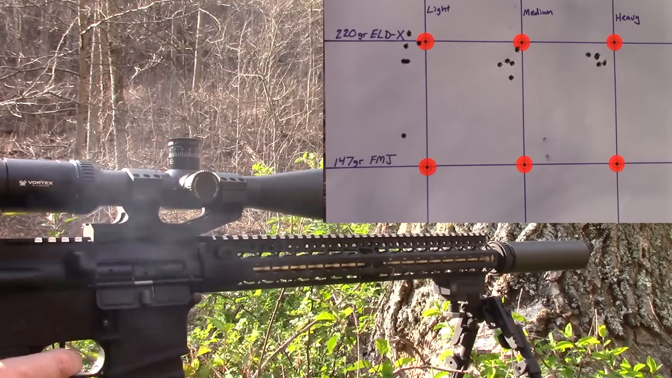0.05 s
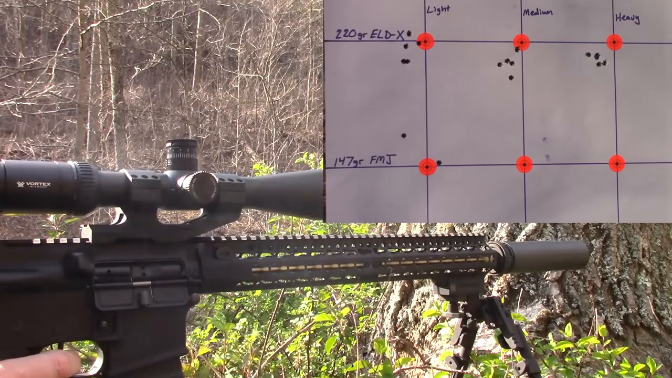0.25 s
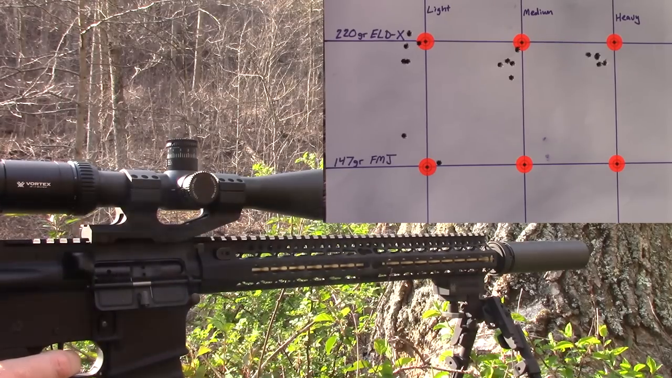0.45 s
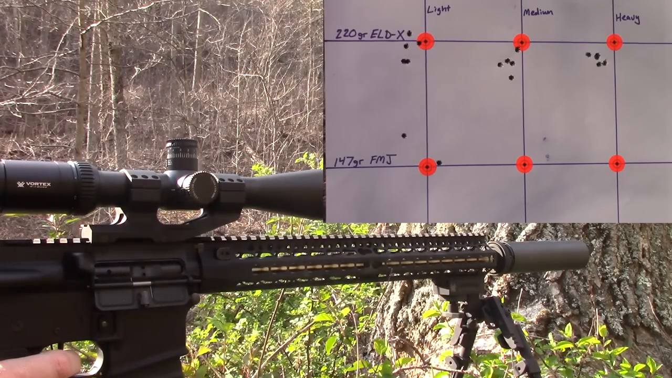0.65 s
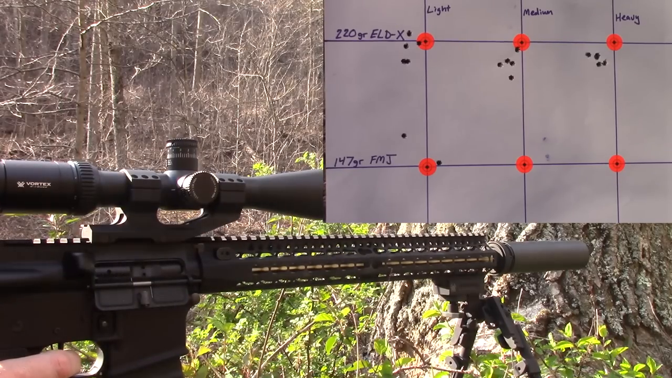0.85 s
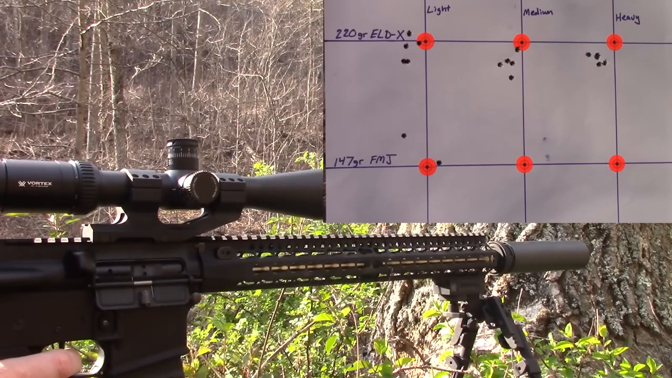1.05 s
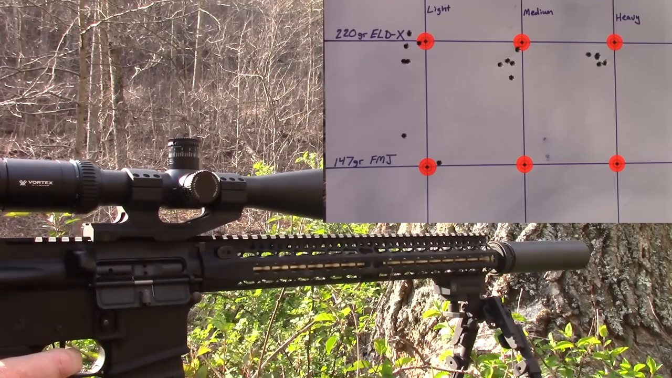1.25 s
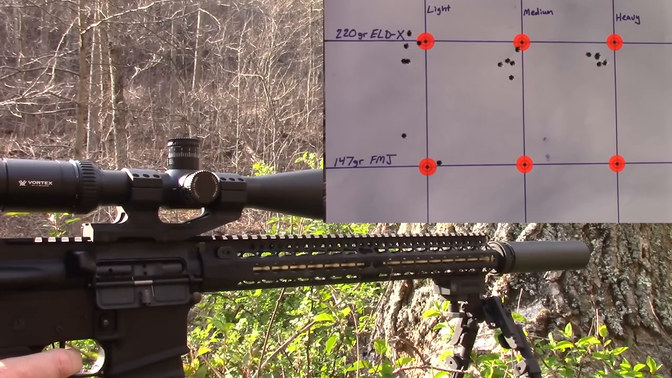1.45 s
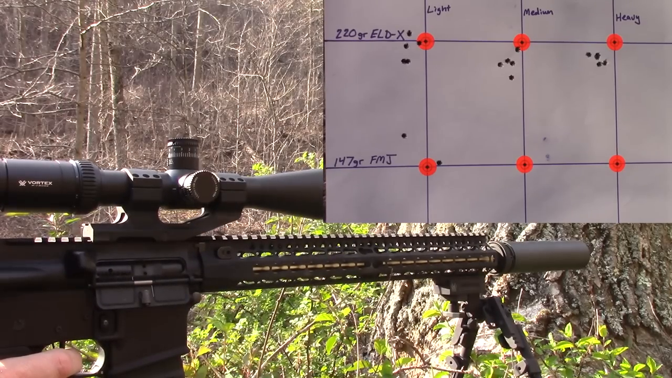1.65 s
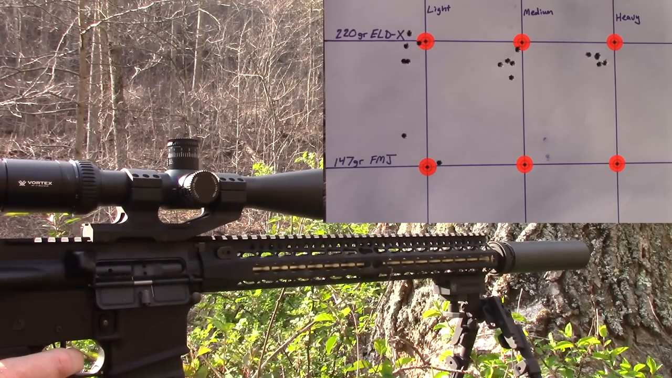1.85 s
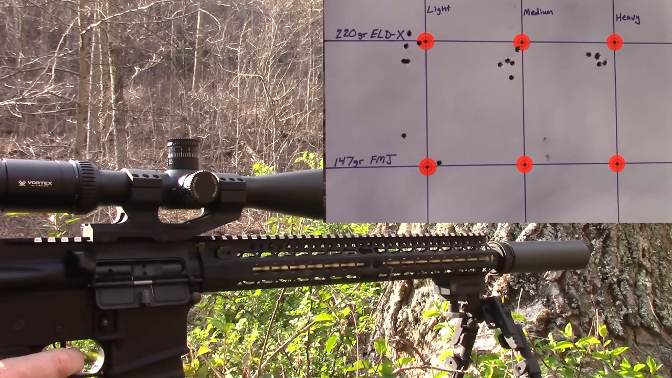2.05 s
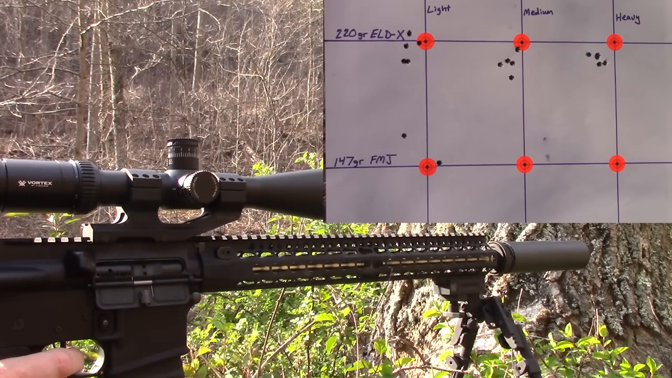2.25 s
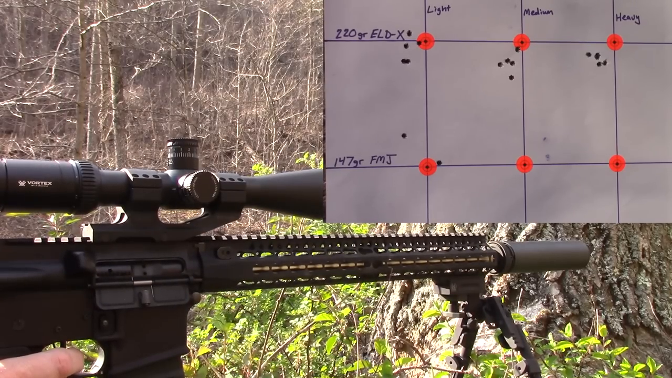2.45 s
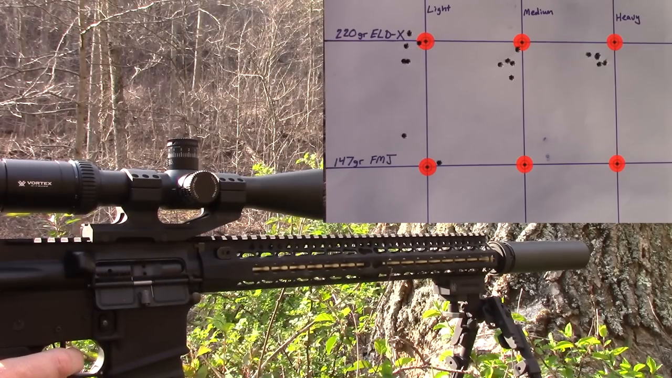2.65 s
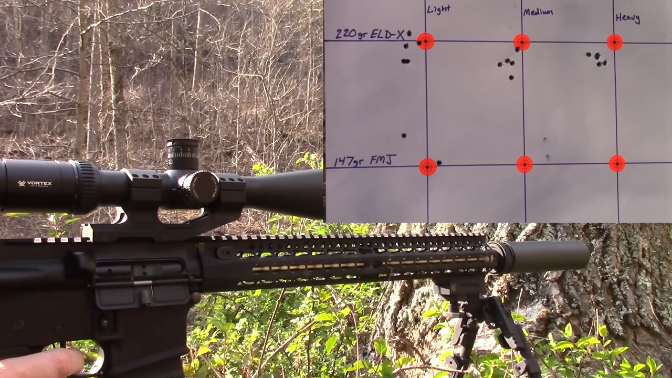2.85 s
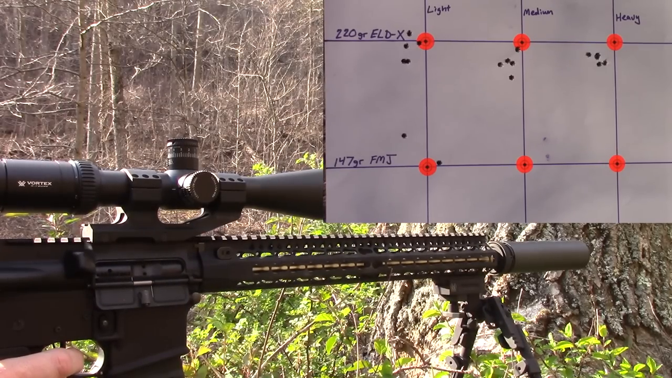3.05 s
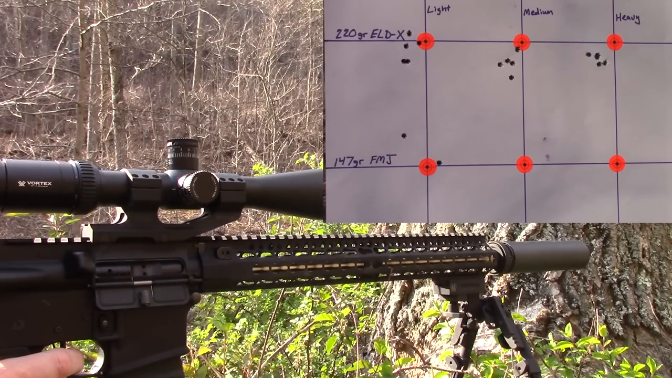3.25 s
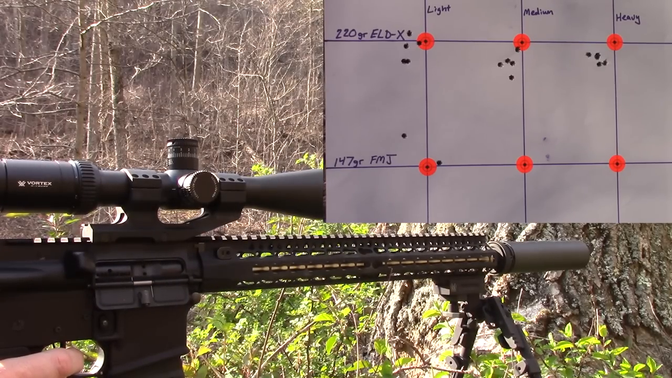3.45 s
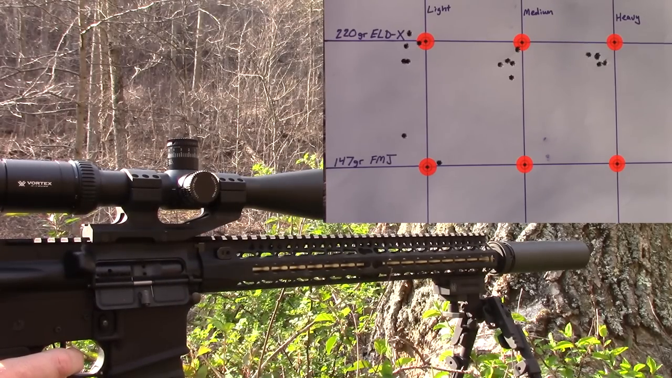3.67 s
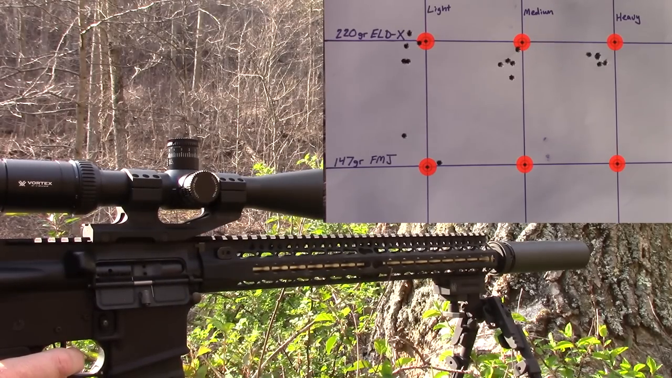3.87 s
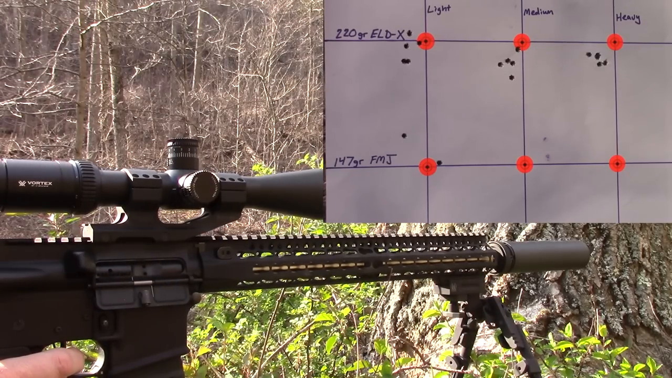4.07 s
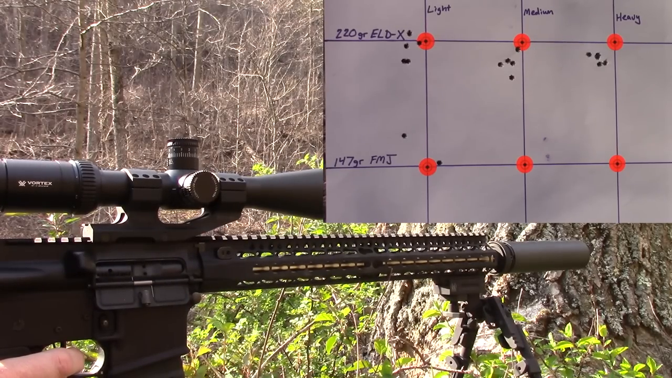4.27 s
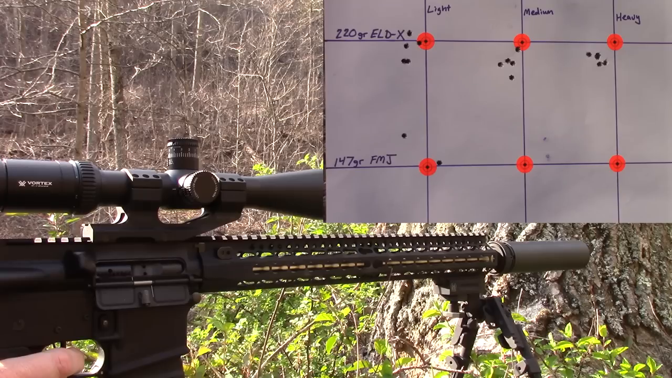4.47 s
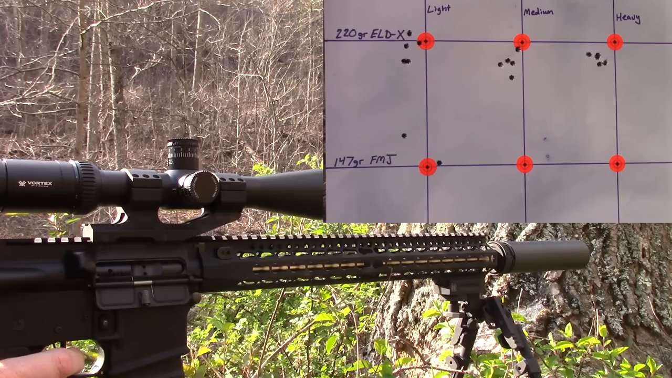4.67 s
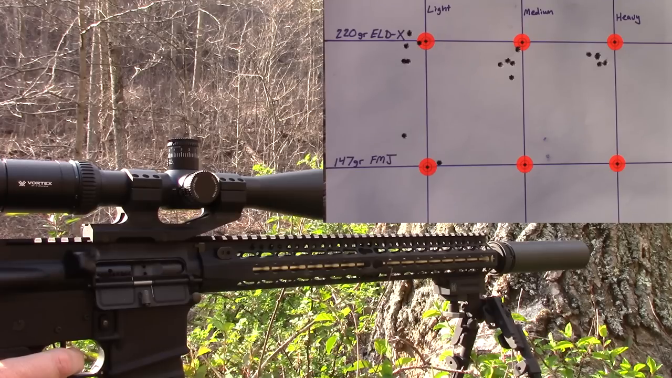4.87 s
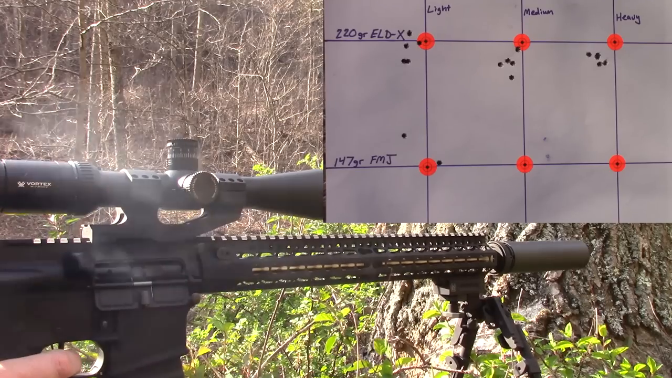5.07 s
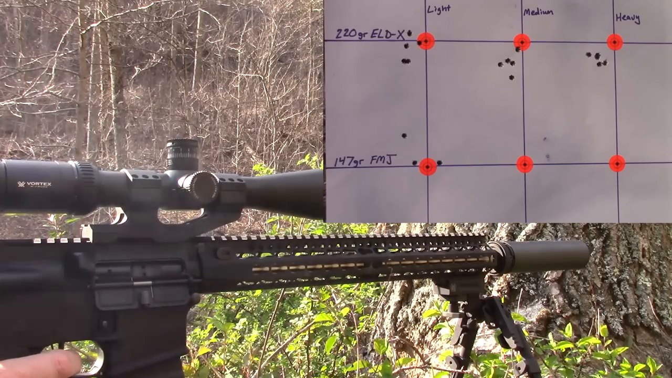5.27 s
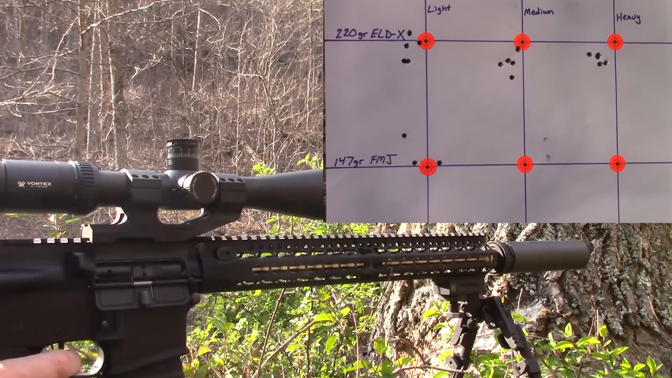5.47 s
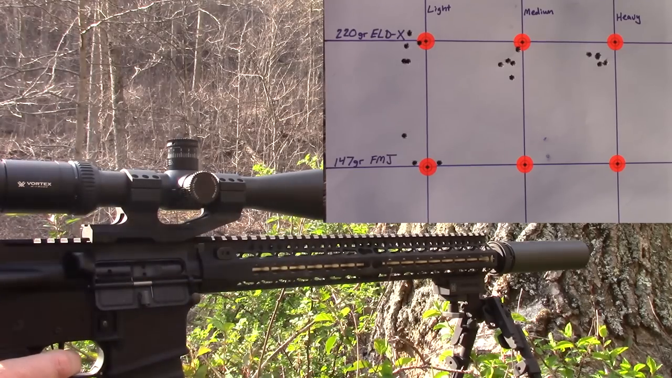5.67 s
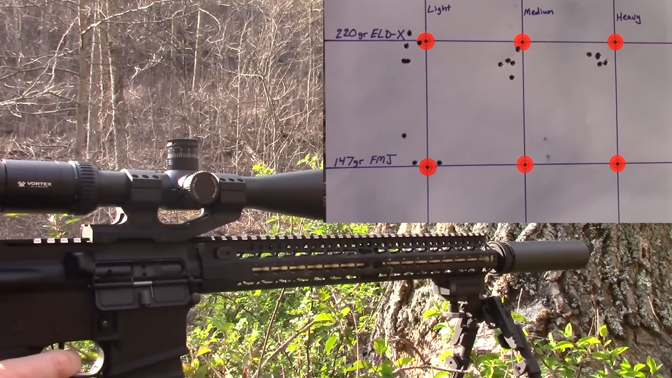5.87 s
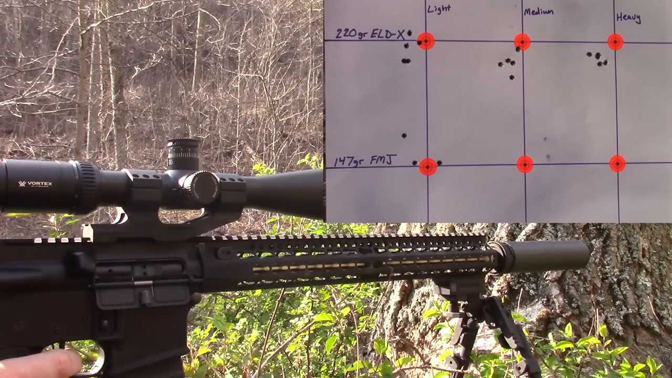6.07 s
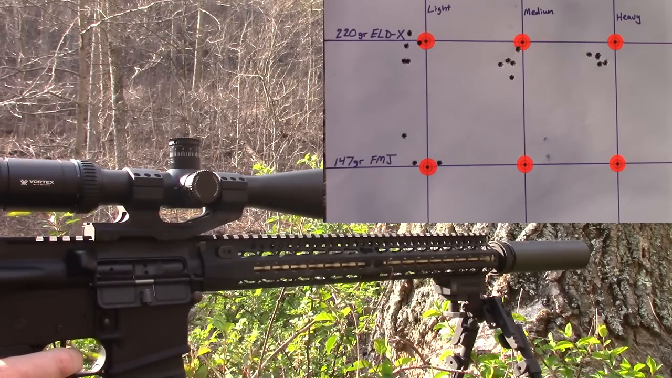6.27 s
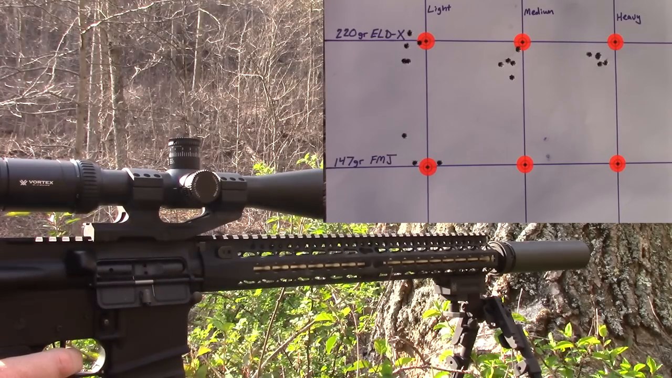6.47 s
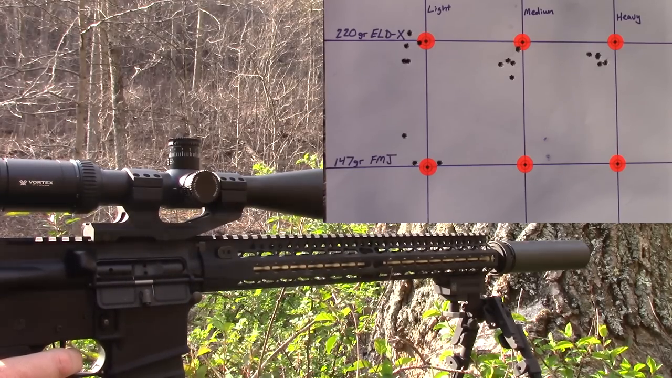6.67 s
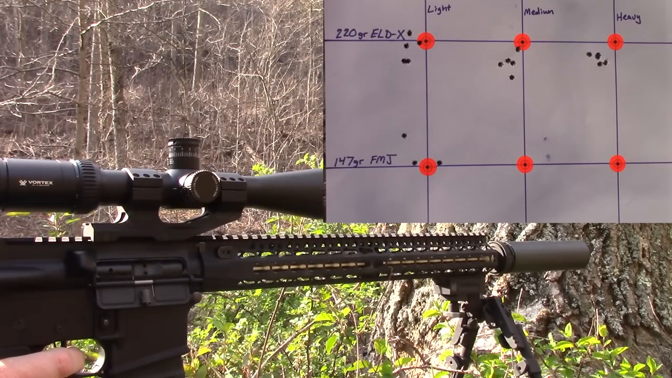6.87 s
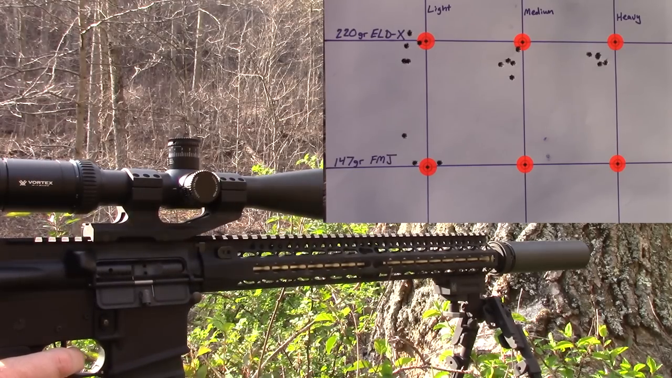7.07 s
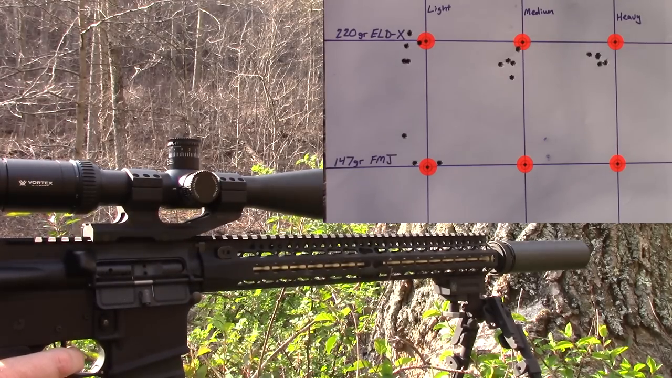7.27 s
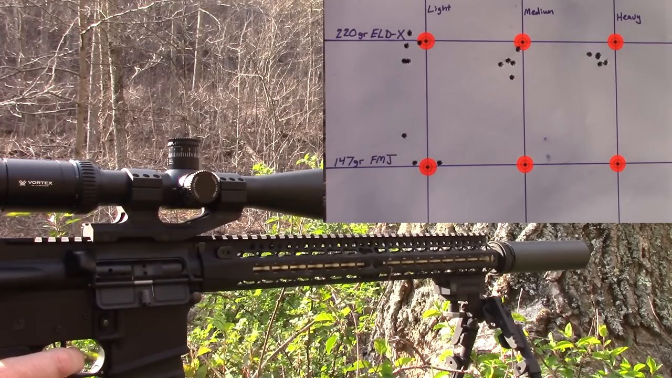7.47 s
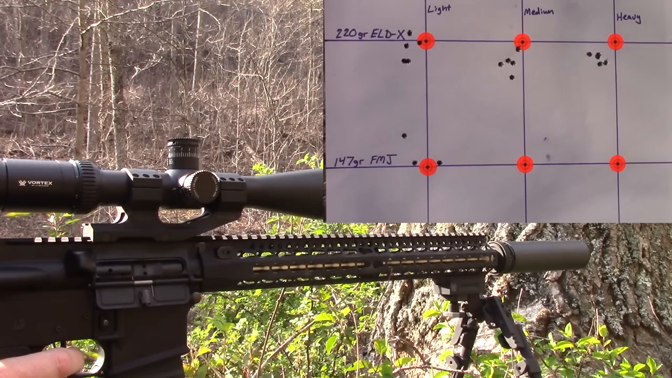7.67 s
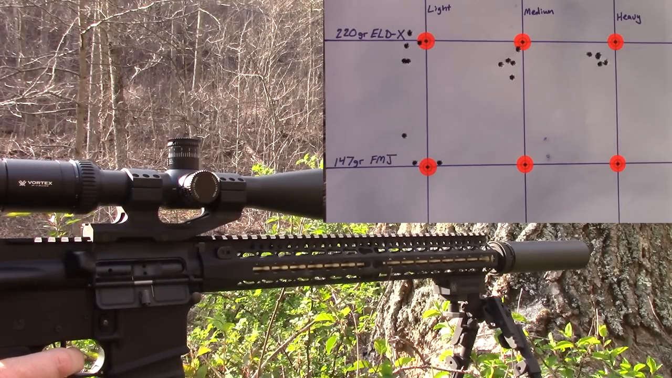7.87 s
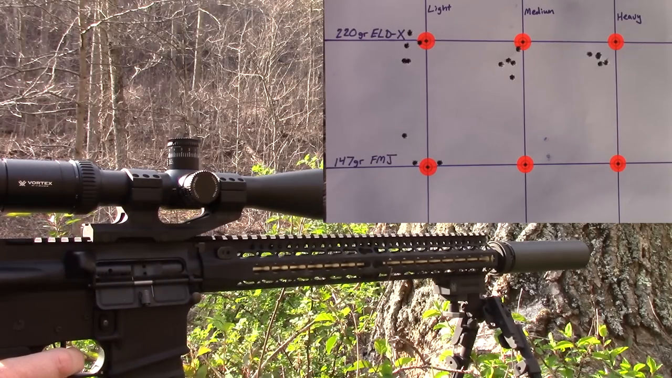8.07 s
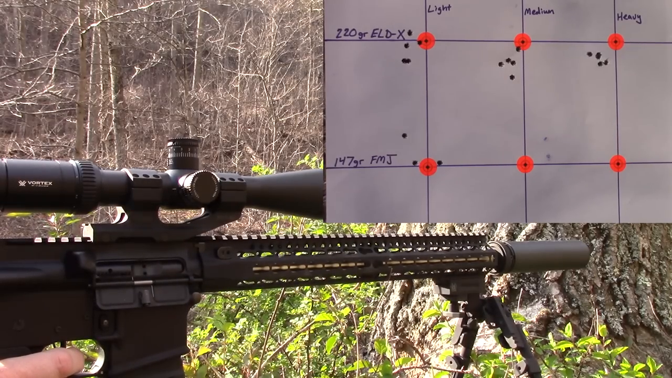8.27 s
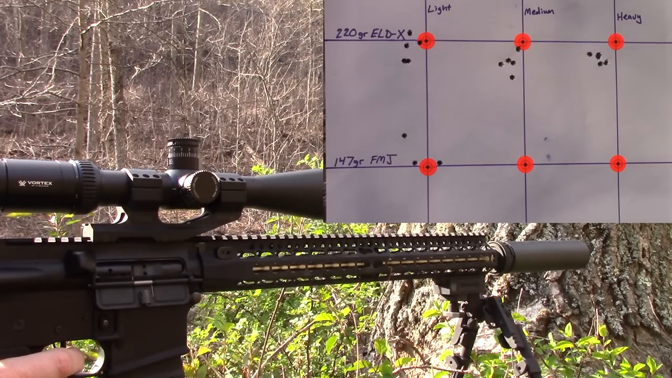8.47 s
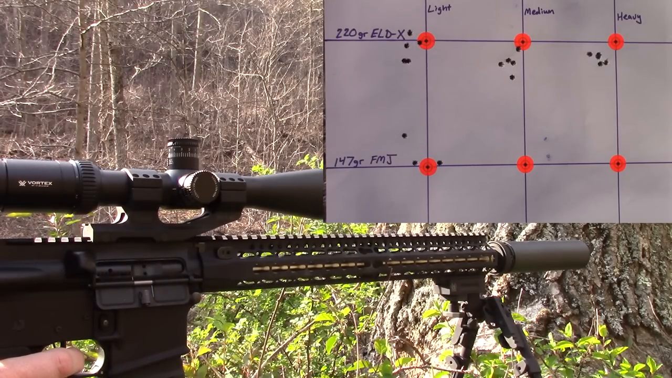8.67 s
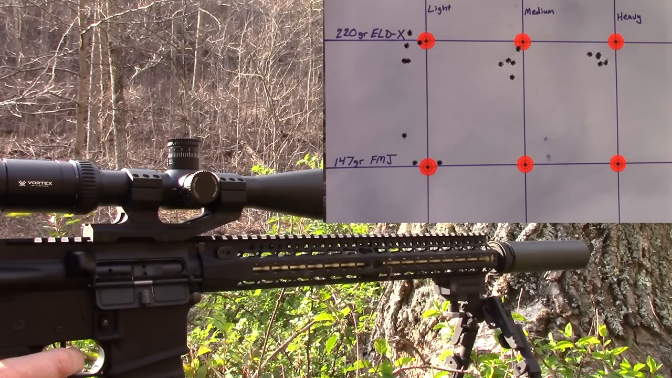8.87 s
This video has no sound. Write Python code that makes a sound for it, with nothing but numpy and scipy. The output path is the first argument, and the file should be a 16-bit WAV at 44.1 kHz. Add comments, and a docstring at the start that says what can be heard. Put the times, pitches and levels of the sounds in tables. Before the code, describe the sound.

Outdoors beside woodland, very close to a silenced self-loading rifle. Immediately a shot goes off: hammer crack, short roar of gas, then the steel bolt and carrier clattering back and slamming home within a fifth of a second, with a high spring ring. Echoes crackle off trees, with a strong sharp slap near 0.54 and a thinner one at 0.66, fading over the next second; a tiny brass tick falls around 0.37. From 1 to 2.9 seconds a small motor faintly ticks and whines. At 2.0 the trigger resets with a loud, dry metal click. Wind rumbles and bumps softly from 3 seconds. The second shot comes at 4.98, equally clattering, with dense slaps until 5.5 and brass ringing at about 5.55. Wind thumps strongest around 5.9; the motor returns faintly until 7.5. Another sharp trigger click lands at 6.87, then quiet hiss and slight wind near the end.

```python
"""At the edge of a wood a silenced self-loading rifle fires twice, heard by a microphone beside the breech.
Each shot is a burst of gas noise plus steel blows: the hammer, and the bolt running back and slamming home.
Bands of noise that swell and die are the echoes off trees; bright ticks and paired tones are the brass case
landing; a later click is the trigger going back. Wind rumble bumps the microphone, and a small motor near it
ticks (clicks that ring) and whines (a thin sine) faintly over quiet air."""
import sys
import numpy as np
from scipy import signal
from scipy.fft import rfft, irfft
from scipy.io import wavfile
from scipy.ndimage import uniform_filter1d

SR = 44100
rng = np.random.default_rng(int(sys.argv[2]) if len(sys.argv) > 2 else 0)


def store_wav(level_fs):
    """Save 16-bit WAV to argv[1]."""
    pcm = np.round(np.clip(np.atleast_2d(level_fs), -1, 1) * 32767)
    wavfile.write(sys.argv[1], SR, pcm.T.astype(np.int16))


N = 393372
TIME = np.arange(N) / SR  # seconds

# gas leaving the breech and muzzle: (t/s, level/dB, length/ms)
BLASTS = [(0.0295, -7.5, 12.3), (4.9886, -3, 8)]
# an even spectrum, the same level everywhere: (f/Hz, level/dB)
FLAT = [(1, 0), (2, 0)]


def amp(db):
    """Turn decibels into a gain."""
    return 10 ** (np.asarray(db) / 20)


def rms_one(x):
    """Scale a sound to an average (rms) strength of 1."""
    return x / np.sqrt(np.mean(x ** 2) + 1e-20)


def at_hz(points, hz):
    """Read a (f/Hz, level/dB) table between its points, on a log-frequency axis."""
    table_hz, table_db = np.array(points).T
    return np.interp(np.log(hz), np.log(table_hz), table_db)


def drift(rate):
    """Slow random wandering with spread 1: noise smoothed twice, faster for a higher rate in Hz."""
    r = np.exp(-80 * np.pi * rate / SR)  # made at every 40th sample
    noise = rng.standard_normal(N // 40 + 2002)
    slow = rms_one(signal.lfilter([1], [1, -2 * r, r * r], noise)[2000:])
    return np.interp(np.arange(N) / 40, np.arange(len(slow)), slow)


def coloured(spectrum, size, side_db):
    """Stereo noise of a given spectrum, rms 1; side_db sets how much left and right differ."""
    hz = np.maximum(np.arange(size // 2 + 1) * SR / size, 1)
    mid, side = rfft(rng.standard_normal((2, size))) * amp(at_hz(spectrum, hz))
    left_right = mid + amp(at_hz(side_db, hz)) * side * [[1], [-1]]
    return rms_one(irfft(left_right, size))


def unit_click(size):
    """A single sample of 1 and then silence, like one sharp tap."""
    return np.eye(1, size)[0]


def ring(clicks, hz, t60):
    """A resonance: each unit click starts a sine of height 1 that falls 60 dB in t60 seconds."""
    r = amp(-60 / (t60 * SR))
    w = 2 * np.pi * hz / SR
    return signal.lfilter([0, np.sin(w)], [1, -2 * r * np.cos(w), r * r], clicks + 1e-18)


def add(out, s, sound):
    """Mix a short sound in at s seconds."""
    i = round(s * SR)
    out[..., i:i + sound.shape[-1]] += sound[..., :N - i]


def burst(spectrum, rise_ms, t60, size=8192):
    """Noise that swells and then dies away, peak 1."""
    # left-right difference of sounds close by, under what they share: (f/Hz, level/dB)
    near_side = [(60, -13), (240, -18.5), (950, -19), (3770, -20), (15000, -19)]
    t = np.arange(size) / SR
    rise = max(rise_ms, .05) / 1000
    shape = np.minimum(t / rise, 1) ** 2 * amp(-60 * np.maximum(t - rise, 0) / t60)
    x = coloured(spectrum, size, near_side) * shape
    return x / np.abs(x).max()


def quiet_air():
    """Steady hiss of the quiet air and the microphone itself."""
    # spectrum of the hiss: (f/Hz, level per Hz/dB)
    air_spectrum = [(18, -46), (30, -23), (145, 0), (364, -0.5), (540, -4), (866, -7.5), (1280, -11),
                    (1390, -8.5), (1540, -6), (1720, -12.5), (5740, -20.5), (10800, -28), (14400, -32.5),
                    (16000, -38.5)]
    # left-right difference, under what they share: (f/Hz, level/dB)
    air_side = [(60, -5.5), (240, -7), (950, -4.5), (3770, -7), (15000, -12.5)]
    # hiss level over time, quieter spans: (start t/s, end t/s)
    quieter_spans = [(.03, 0.56), (4.99, 5.95)]
    air_db, quieter_db, return_s = -58, -4, 0.17
    quieter = np.zeros(N)
    for s, end in quieter_spans:
        quieter += np.interp(TIME, [s, s + .01, end, end + return_s], [0, 1, 1, 0])
    return amp(air_db + quieter_db * quieter + 0.66 * drift(2.7)) * coloured(air_spectrum, N, air_side)


def motor():
    """A small motor: rounds of four short buzzes, thirty a second, and a thin tone switched on twice a round."""
    # the motor runs: (start t/s, stop t/s)
    runs = [(1.034, 2.92), (5.841, 7.49)]
    # spans where buzz and whine are fainter: (start t/s, end t/s)
    quieter_spans = [(2.03, 2.22), (2.44, 2.59), (7.31, 7.5)]
    quieter_db, round_s = -7, .15
    buzz_step_hz, click_db = 425, -52
    whine_hz, whine_db, whine_sag_db = 5561, -69.98, 1.5  # each whine sags at random from this peak level
    # buzz level rises over the first rounds, while the echo still covers it
    buzz_rise_from_db, buzz_rise_s = -5, .75
    clicks, gate, running = np.zeros(N), np.zeros(N), np.zeros(N)
    steps = (np.arange(4)[:, None] / 30 + np.arange(5) / buzz_step_hz).ravel()  # five clicks a buzz
    push_pull = np.tile((-1) ** np.arange(5), 4)  # steps alternate in direction
    for start, stop in runs:
        running[(TIME > start - round_s) & (TIME < stop)] = 1
        for s in np.arange(start, stop, round_s):
            round_db = click_db + buzz_rise_from_db * max(1 - (s - start) / buzz_rise_s, 0)
            step_gain = amp(round_db + rng.normal(0, 3.0, len(steps)))
            clicks[np.round((s + steps - .002) * SR).astype(int)] = step_gain * push_pull
            short, long = amp(whine_db - whine_sag_db * rng.exponential(1, 2))
            gate[round((s + .032) * SR):round((s + .066) * SR)] = short
            gate[round((s + .1) * SR):round((s + .149) * SR)] = long
    for start, stop in quieter_spans:
        running[(TIME > start) & (TIME < stop)] = amp(quieter_db)
    whine_gain = uniform_filter1d(gate * running, size=130)  # soft edges
    whine = np.sin(2 * np.pi * whine_hz * TIME) * whine_gain
    buzz = ring(clicks * running, 2120, .007)
    return buzz + whine


def wind():
    """Wind on the microphone: lumpy rumble under the gusts, with single soft bumps of a few cycles."""
    # strength of the rumble over time: (t/s, level/dB)
    gusts = [(0.0, -67), (0.2, -62), (0.45, -69), (0.67, -77), (1.49, -82.5), (2.88, -82), (3.08, -68.5),
             (3.5, -71.5), (4.15, -63), (4.87, -67.5), (5.14, -60), (5.44, -70), (5.71, -80), (5.91, -60),
             (6.36, -73.5), (7.53, -79), (7.97, -81), (8.92, -65)]
    # single bumps: (t/s, peak level/dB, f/Hz)
    bumps = [(0.369, -36, 221), (3.018, -52, 88.8), (3.143, -55, 77.7), (3.457, -53, 127),
             (3.773, -47, 144.4), (3.798, -45.5, 123), (3.829, -50.5, 245), (3.962, -44, 101.6),
             (4.029, -48, 93.4), (4.265, -38.5, 160.5), (4.308, -44.5, 114), (4.339, -52, 127),
             (4.584, -50, 85.2), (4.6, -49, 139.4), (5.39, -47, 121), (5.495, -51, 100), (5.53, -51, 110),
             (5.74, -49, 85), (5.799, -34, 141), (5.859, -38.5, 142), (5.896, -30, 163), (5.927, -37, 106),
             (6.054, -47, 113.6), (6.139, -45.5, 80.3), (6.289, -48, 84.5), (6.607, -50, 117),
             (6.644, -45, 136), (6.699, -50.5, 98.6), (8.757, -49.5, 137.4)]
    small_bumps_per_s, small_bump_db = 2.5, 12.5  # at random times; at most this far over the gust level
    rumble_spectrum = [(20, -15.5), (60, 4.5), (110, 1.0), (250, -24), (600, -46.5)]
    rumble = coloured(rumble_spectrum, N, [(20, -15.0), (300, -7.5)])
    gust_db = np.interp(TIME, *np.transpose(gusts))
    out = amp(gust_db + 3.4 * drift(9)) * rumble
    small = []
    for place, soft, pitch in rng.random((int(small_bumps_per_s * N / SR), 3)):
        peak_db = gust_db[int(place * N)] + small_bump_db - 6 * soft
        small.append((place * N / SR, peak_db, 55 + 80 * pitch))
    for s, peak_db, hz in bumps + small:
        cycles = np.arange(4096) / SR * hz
        bump = np.sin(2 * np.pi * cycles) * cycles * np.exp(1 - cycles / 0.74) / 0.77
        add(out, s, amp(peak_db) * bump * amp([[-1.0], [1.0]]))  # slightly stronger on the right
    return out


def swelling(hz):
    """Gain of one band over time: every roar rises, may hold, and falls as air eats its top; their powers add."""
    # roars after every blast: the carrier runs back, leftover gas hisses out, the carrier scrapes forward,
    # its spring sings, the nearest trunks answer: (t after blast/s, level/dB, centre f/Hz,
    # width below to -6 dB/octaves, width above/octaves, rise/s, hold/s, fall/(dB per s))
    after_blast = [(0.0079, -26.5, 1800, 0.28, .4, .015, .03, 301.5),
                   (0.004, -32.5, 5000, 1.57, 1.2, 0.004, 0.098, 151),
                   (.11, -31.5, 7000, 1.66, .9, 0.017, 0.042, 496),
                   (0.1, -27, 10100, 0.1, .13, 0.018, 0.044, 399.5),
                   (.105, -27, 3340, 1.13, 1.18, .04, .015, 227)]
    # echo from the ground and from trees near and far: (t/s, level/dB, centre f/Hz,
    # width below to -6 dB/octaves, width above/octaves, rise/s, fall/(dB per s))
    swells = [(.035, -34, 450, 1.3, .7, .012, 499.5), (.085, -32, 200.2, 0.74, .6, .07, 75.5),
              (.19, -34, 2700, 0.96, 1.28, 0.083, 31.5), (.20, -47, 420, 1.2, 0.48, .06, 22),
              (.535, -42, 4000, 1.6, 0.72, 0.0246, 53), (.60, -47.5, 1400, 1.38, 1.2, 0.1, 16.5),
              (0.643, -35.5, 3600, 0.79, 0.54, 0.046, 5.5), (.643, -54.5, 7440, .6, 0.41, 0.0074, 32),
              (4.993, -29, 449.4, 1.05, 0.69, .012, 400), (5.05, -35, 300, 1.5, .9, .015, 200),
              (5.09, -31.5, 174, 0.4, 0.82, 0.045, 154), (5.095, -36.5, 750, 0.6, .8, .045, 151),
              (5.15, -38, 2250, 1.5, 1.5, 0.035, 14), (5.401, -51, 940, 1.67, 1.96, 0.02, 8.5),
              (5.49, -47.5, 3500, -1.5, 0.75, 0.014, 34), (6.12, -48.5, 1100, 1.15, 0.88, 0.078, 28.5)]
    air_loss_db_per_s, air_loss_power = 3.5, 1.63  # loss at 1 kHz; it grows faster than frequency
    roars = [(s + after, *rest) for s, *_ in BLASTS for after, *rest in after_blast]
    roars += [(*row[:-1], 0, row[-1]) for row in swells]  # swells have no hold
    s, db, centre, below, above, rise, hold, fall = np.transpose(roars)[:, :, None]
    t = np.arange(0, N, 32) / SR
    octaves_off = np.log2(hz / centre)
    db = db - 6 * (octaves_off / np.where(hz < centre, below, above)) ** 2
    db = db - fall * np.maximum(t - s - rise - hold, 0)
    db = db - air_loss_db_per_s * (hz / 1000) ** air_loss_power * np.maximum(t - s - hold, 0)
    gains = amp(db) * np.clip((t - s) / rise, 0, 1)
    return np.interp(TIME, t, np.sqrt(np.sum(gains ** 2, axis=0)))


def wood():
    """Roars of the action and leftover gas, then countless trunks answering: crackling noise in shaped bands."""
    # left-right difference, under what they share: (f/Hz, level/dB)
    wood_side = [(60, -15.5), (240, -26.5), (950, -25.5), (3770, -13), (15000, -12)]
    grain = amp(2.0 * drift(70))  # trunks stand unevenly: the answer crackles
    noise = [coloured(FLAT, N, wood_side) for draw in range(2)]
    half_octaves = 70 * 2 ** np.arange(0, 5, .5)
    third_octaves = 2240 * 2 ** np.arange(0, 3.1, 1 / 3)
    edges = np.r_[half_octaves, third_octaves]
    out = np.zeros((2, N))
    for k, (low, high) in enumerate(zip(edges, edges[1:])):
        band_filter = signal.butter(3, [low, high], "band", fs=SR, output="sos")
        band = rms_one(signal.sosfilt(band_filter, noise[k % 2]))  # neighbours use different noise
        out += swelling(np.sqrt(low * high)) * amp(1.0 * drift(23)) * band
    return out * grain


def slaps():
    """A single echo keeps one broad band of the crack; the air takes the top off steeply."""
    # echoes off trunks and ground: (t/s, peak level/dB, centre f/Hz, width/octaves, time to fall 60 dB/s)
    echoes = [(0.147, -13, 2470, 1, .014), (0.345, -27, 2620, 1.1, .014), (0.443, -25, 2040, 1.4, 0.016),
              (0.462, -19, 1520, 2.2, 0.022), (0.537, -3, 3500, 1.2, 0.012),
              (0.662, -14, 3130, 0.71, 0.008), (5.008, -3, 1682, 1.44, .0071),
              (5.104, -3.5, 2800, 0.88, 0.0094), (5.165, -9.5, 1420, 2.3, .0085),
              (5.197, -16, 2470, 1.8, .014), (5.22, -12.5, 1950, 1.6, .037), (5.302, -16, 1510, .89, .0072),
              (5.401, -20, 1460, 0.6, 0.019), (5.421, -12.5, 1550, 1.67, 0.011),
              (5.468, -24, 1710, 1.5, .014), (5.491, -9.5, 3830, 1.16, 0.0056),
              (5.845, -29, 930, 1.8, 0.015), (6.003, -38, 950, 1.3, .014)]
    out = np.zeros((2, N))
    for s, peak_db, hz, octaves, t60 in echoes:
        low, high = np.clip(hz * 2 ** (np.array([-.5, .5]) * octaves), 50, 18000)
        low_cut = signal.butter(2, low, "high", fs=SR, output="sos")
        high_cut = signal.butter(4, high, fs=SR, output="sos")
        slap = signal.sosfilt(np.r_[low_cut, high_cut], burst(FLAT, 1.0, t60, size=4096))
        add(out, s, amp(peak_db) * slap / np.abs(slap).max())
    return out


def brass():
    """The case lands: a bright tick, then two close tones of the tube beating."""
    # touchdowns: (t/s, tick level/dB, level of first tone/dB, first tone f/Hz, time to fall 60 dB/s)
    landings = [(.372, -44, -61, 9100, 0.37), (5.342, -44, -85, 8700, .3), (5.526, -70, -57, 8800, 0.19),
                (5.546, -45, -47.5, 8800, 0.24), (6.133, -58, -76, 8900, 0.23)]
    out, tap = np.zeros((2, N)), unit_click(16384)
    for s, tick_db, ring_db, hz, t60 in landings:
        tick = burst([(3000, -23), (9000, -5.0), (13000, 0)], 0.37, 0.023, size=4096)
        tones = ring(tap, hz, t60) + 0.59 * ring(tap, hz + 45, t60)
        add(out, s, amp(tick_db) * tick)
        add(out, s, amp(ring_db) * tones)
    return out


def blast():
    """Turbulent gas: a sputtering roar for some milliseconds, then a quick fall."""
    # spectrum of the gas noise: (f/Hz, level per Hz/dB)
    gas_spectrum = [(24, -42), (40, -15), (529, 1.5), (1410, -6), (2840, -3.5), (3220, -10), (3740, -8.5),
                    (7730, -6.5), (13400, -9.5), (16000, -25)]
    # left-right difference, under what they share: (f/Hz, level/dB)
    gas_side = [(60, -6.5), (180, -8), (550, -5.5), (1650, -7), (4970, -12.5), (15000, -24)]
    out, ms = np.zeros((2, N)), np.arange(4096) / SR * 1000
    for s, db, length_ms in BLASTS:
        shape = np.minimum(ms / 0.77, 1) * amp(-4 * np.maximum(ms - length_ms, 0))  # falls 4 dB per ms
        sputter = amp(2.0 * drift(250)[:len(ms)])
        add(out, s, amp(db) * shape * sputter * coloured(gas_spectrum, len(ms), gas_side))
    return out


def action():
    """Each steel blow is a crack that shakes the part struck, rings the receiver and comes back off things nearby."""
    # steel on steel: (t/s, peak level of the crack/dB, rise/ms, part struck)
    blows = [(0.0247, -3.5, 1.25, "hammer"), (0.0563, -9, 0.92, "bolt"), (0.0683, -8.5, 0.41, "carrier"),
             (0.0811, -4.5, 0.85, "bolt"), (.0845, -9.5, 1.5, "carrier"), (.0900, -2.5, 6.2, "rail"),
             (0.0987, -2, 0.65, "lugs"), (0.145, -14, 1.1, "spring"), (.1625, -14, 1.1, "spring"),
             (.1700, -24, 0.95, "bolt"), (0.1906, -14, 1.3, "bolt"), (2.003, 2, 1.53, "trigger"),
             (4.9831, -6.5, .97, "hammer"), (5.0148, -12, 0.79, "lugs"), (5.0269, -10.5, 0.82, "carrier"),
             (5.0390, -7, 1.7, "carrier"), (5.0450, -2, 4.5, "bolt"), (5.0564, 0.5, 1.46, "lugs"),
             (5.0684, -4.5, 0.72, "bolt"), (5.1249, -10, 2.8, "spring"), (6.8737, 2.5, 1.54, "trigger")]
    # parts struck, by name: (ringing f/Hz, ringing level/dB, time for the crack to fall 60 dB/s)
    parts = {"hammer": (3500, -13, .018), "carrier": (1800, -1.5, .05), "bolt": (2900, -8, .035),
             "lugs": (6250, -3, .045), "rail": (7550, -15.5, .03), "spring": (10100, -6, .04),
             "trigger": (3250, -5.5, .016)}
    # ringing of receiver and bolt: (f/Hz, level against the other tones/dB, time to fall 60 dB/s)
    steel = [(296, -11, .15), (727, -9, .1), (1787, 0, .11), (2046, -11, .14), (2950, -6, .11),
             (3461, -1, .12), (4705, -5, .08), (5360, -5, .075), (6169, -17, .2), (7488, -16, .1),
             (9297, -25, .25), (9469, -23, .17), (10100, -9, .06)]
    # spectrum of the crack: (f/Hz, level per Hz/dB)
    crack_spectrum = [(59, -47), (100, -21), (583, -7.5), (1910, -17.5), (3050, -4), (3700, -1.5),
                      (4570, -13), (6150, -4.5), (6990, -10.5), (7610, -3), (8280, -11), (9610, -9),
                      (13200, -13.5), (16000, -34.5)]
    # spectrum of the wash off things nearby: (f/Hz, level per Hz/dB)
    wash_spectrum = [(100, -6.5), (1000, -3.5), (4000, -4), (8000, -12), (16000, -25)]
    out, tap = np.zeros((2, N)), unit_click(9000)
    for s, peak_db, rise_ms, struck in blows:
        part_hz, part_db, t60 = parts[struck]
        crack = burst(crack_spectrum, rise_ms, t60)
        part = ring(crack, part_hz, 0.24 * t60)  # driven by the rough crack, so the tone is rough too
        part = amp(part_db) * part / np.abs(part).max()
        wash = amp(-32.5) * burst(wash_spectrum, 2.2, 0.22)
        add(out, s, amp(peak_db) * (crack + part + wash))
        modes = sum(amp(db + rng.normal(0, 1.5)) * ring(tap, hz, ring_t60) for hz, db, ring_t60 in steel)
        add(out, s + rise_ms / 1000, amp(peak_db - 30) * modes)
    return out


def scene():
    """Quiet air, motor and wind, with the rifle and its echoes on top."""
    shots = wood() + slaps() + brass() + blast() + action()
    # high-pass: keep deep bass out of the shots and their echoes
    shots = signal.sosfilt(signal.butter(3, 110, "high", fs=SR, output="sos"), shots)
    return quiet_air() + motor() + wind() + shots


def record(dry):
    """Peaks are rounded near full scale, then the top is cut: 60 dB down from 16550 Hz upward."""
    rounded = np.tanh(dry / .95) * .95
    return signal.sosfilt(signal.cheby2(12, 60, 16550, fs=SR, output="sos"), rounded)


dry = scene()
out = record(dry)
store_wav(out)
```